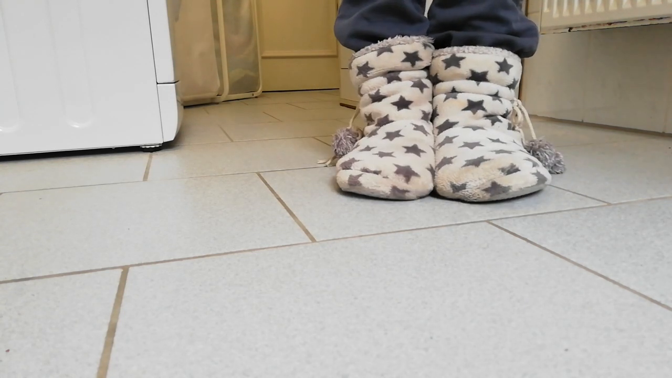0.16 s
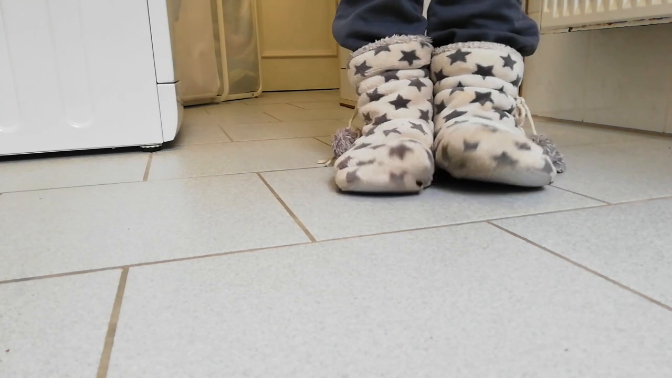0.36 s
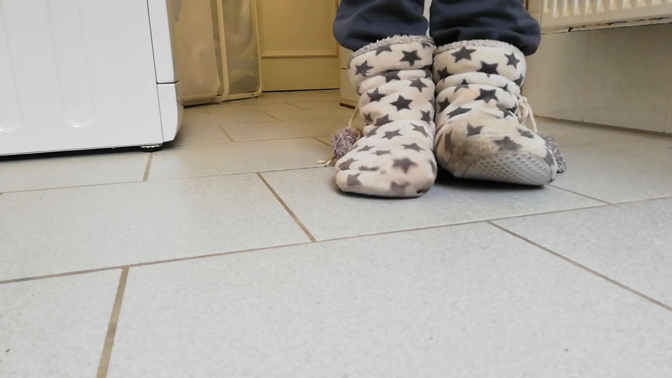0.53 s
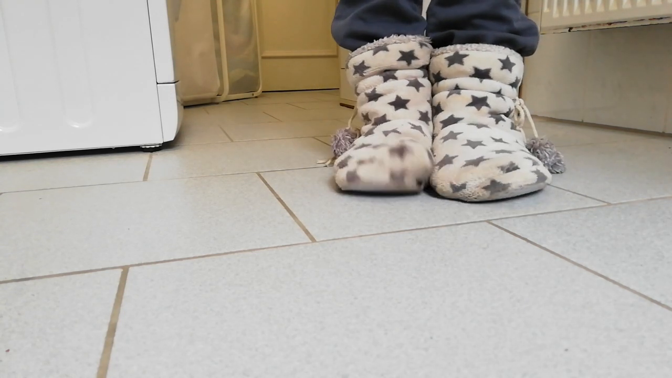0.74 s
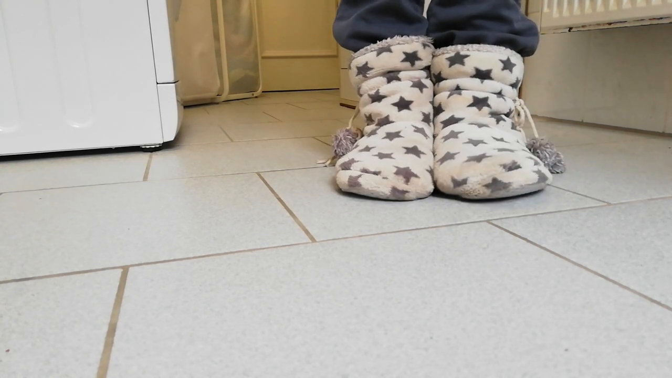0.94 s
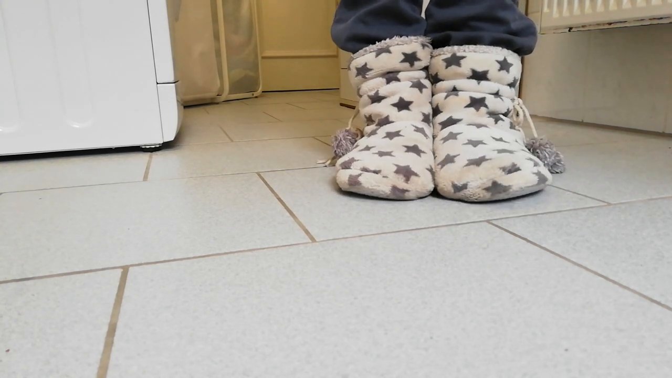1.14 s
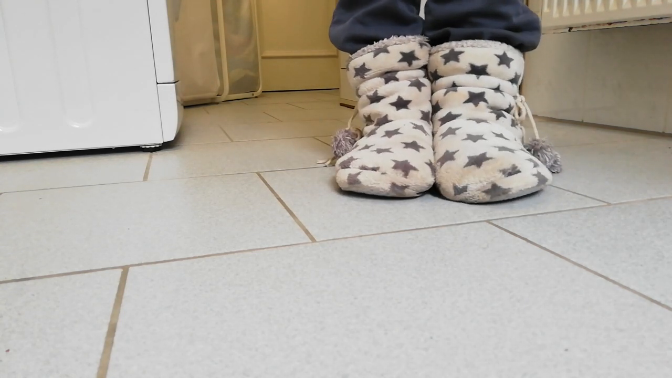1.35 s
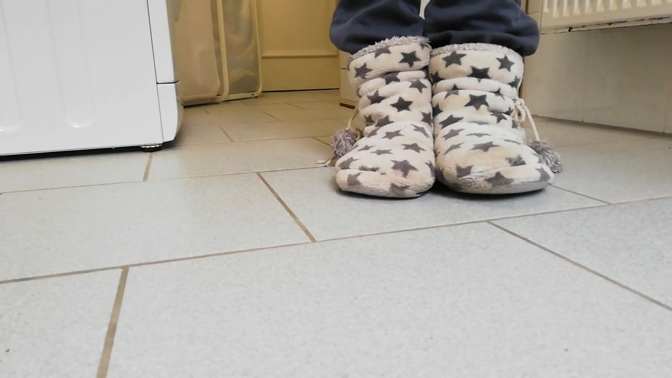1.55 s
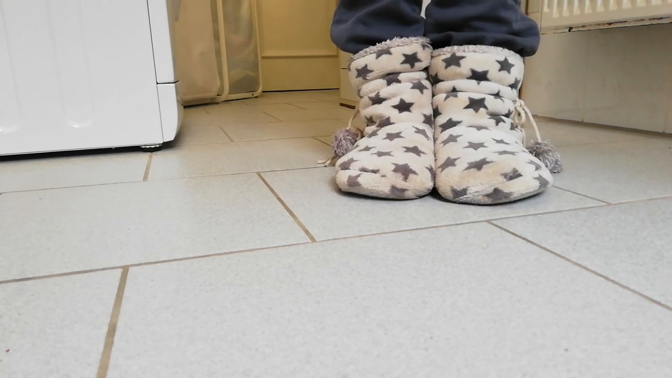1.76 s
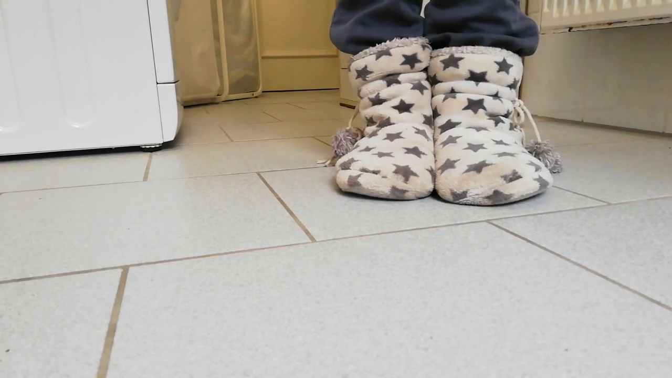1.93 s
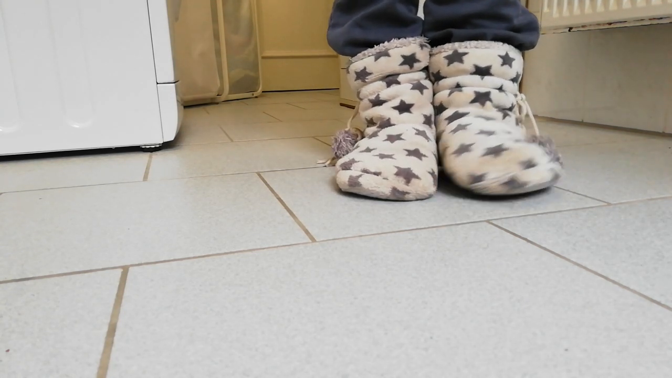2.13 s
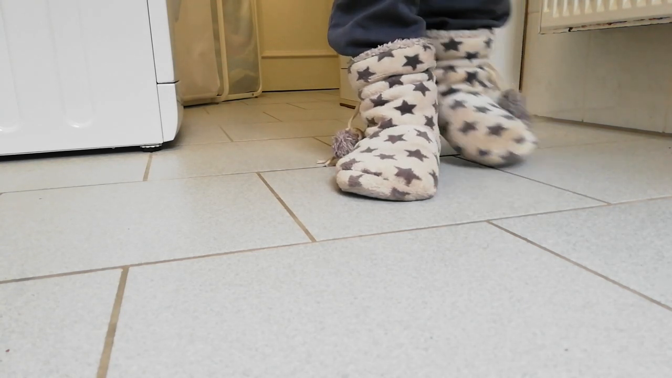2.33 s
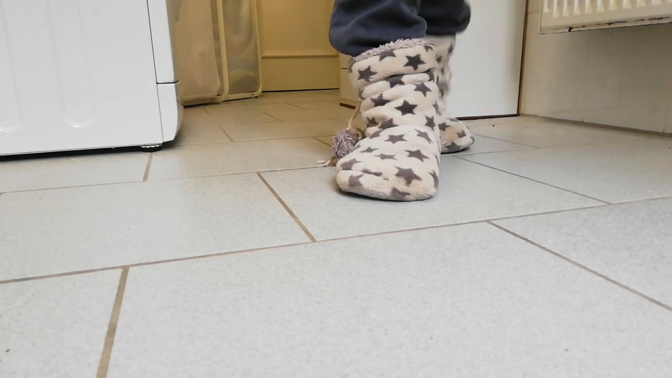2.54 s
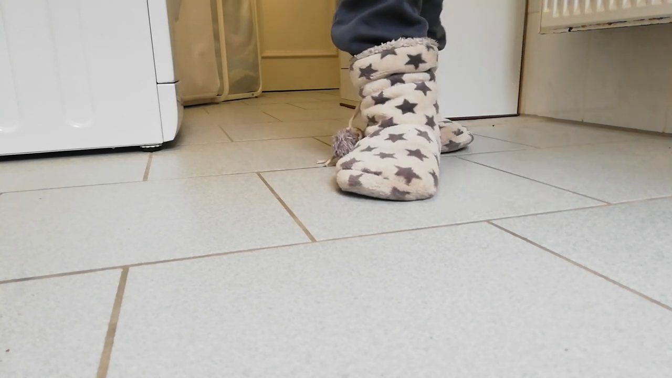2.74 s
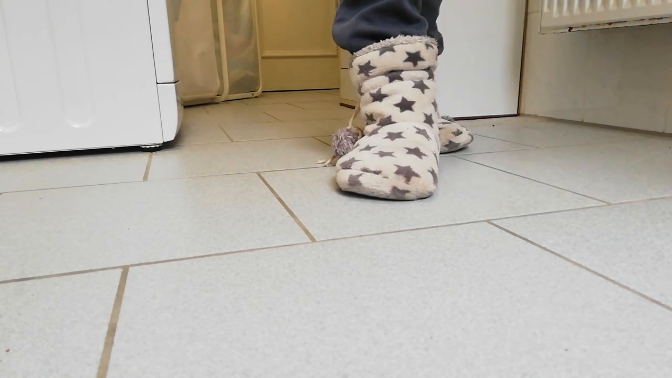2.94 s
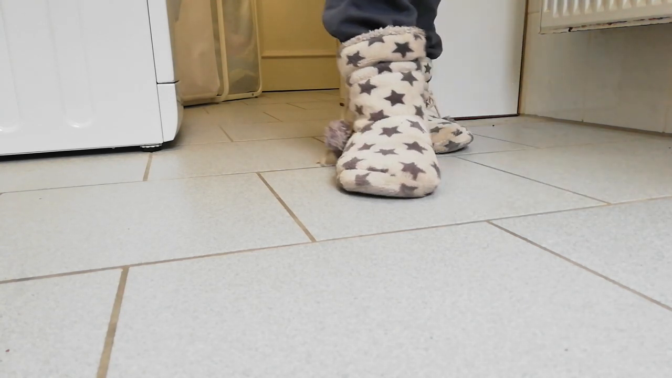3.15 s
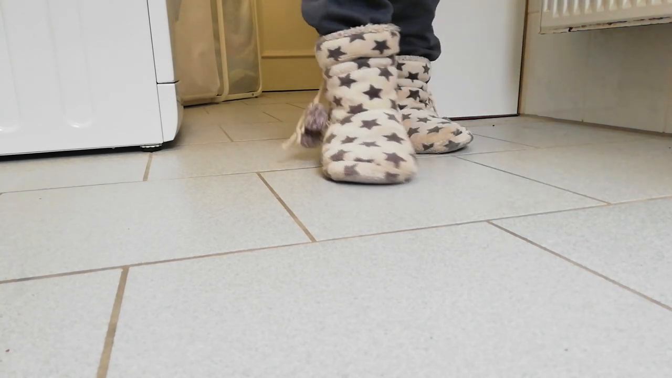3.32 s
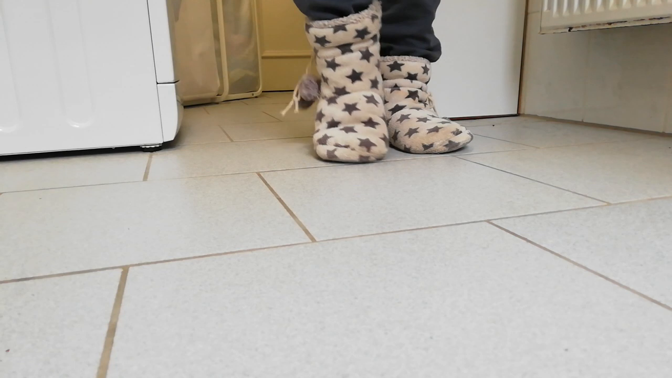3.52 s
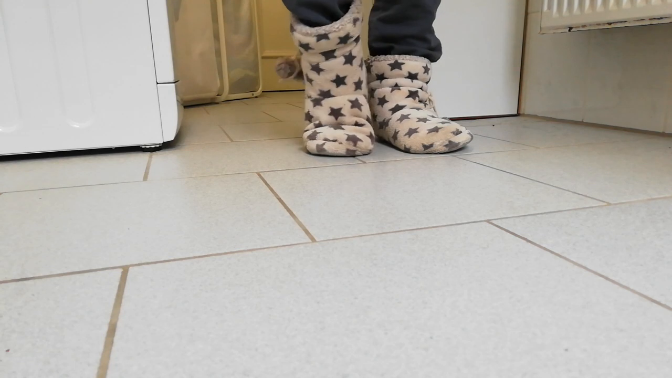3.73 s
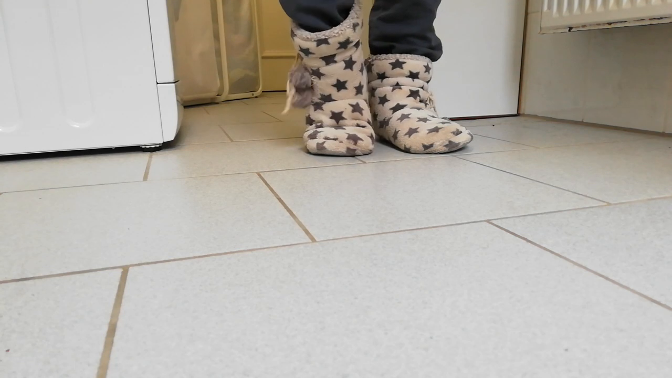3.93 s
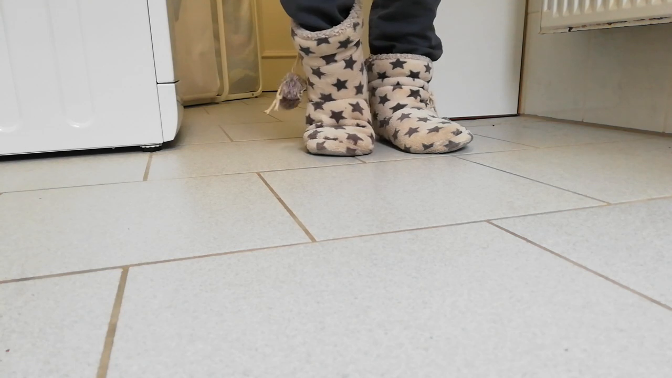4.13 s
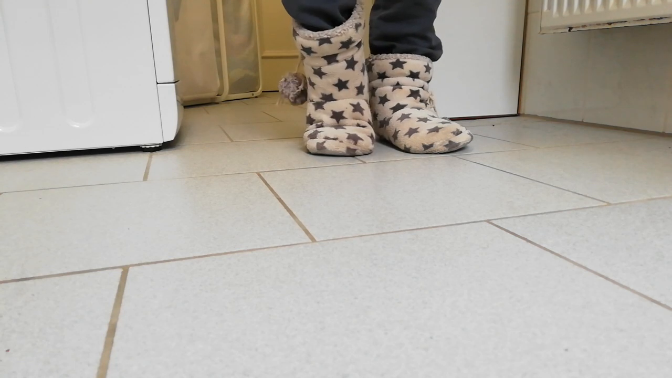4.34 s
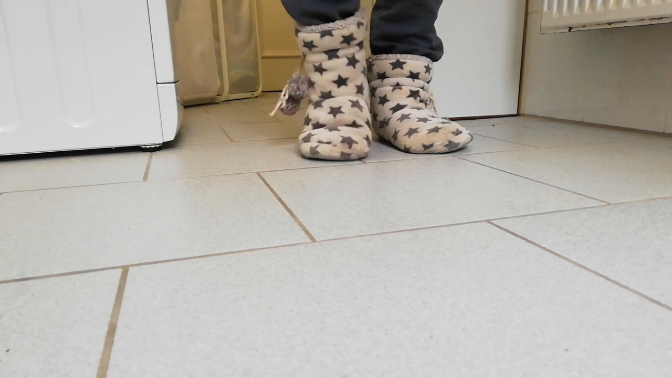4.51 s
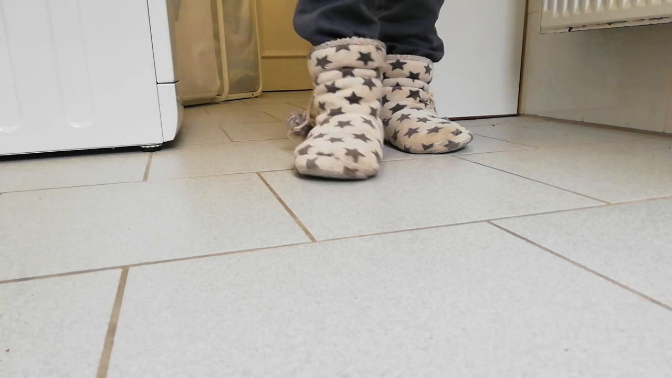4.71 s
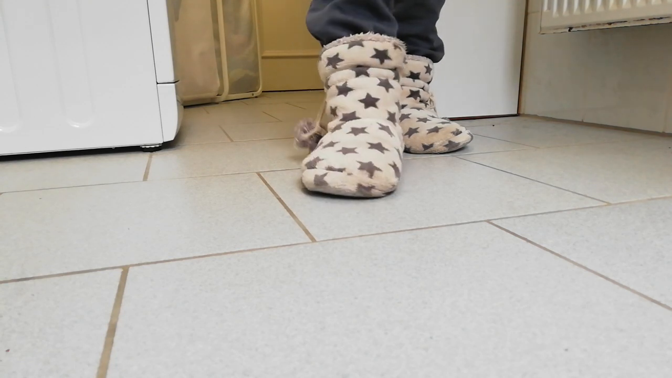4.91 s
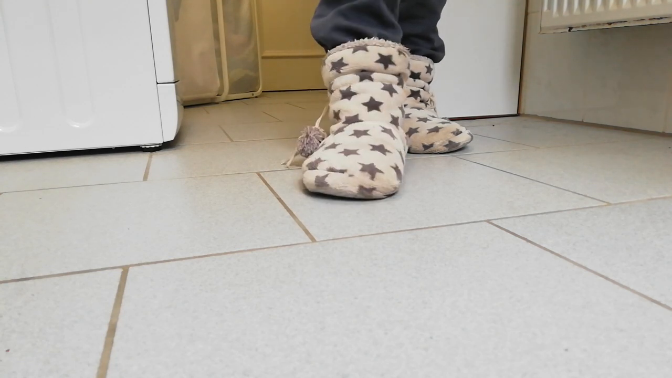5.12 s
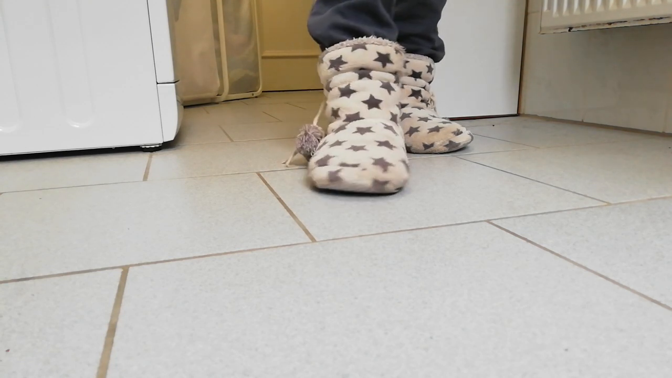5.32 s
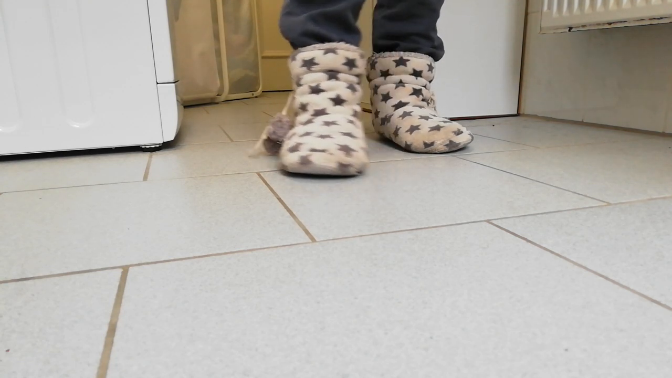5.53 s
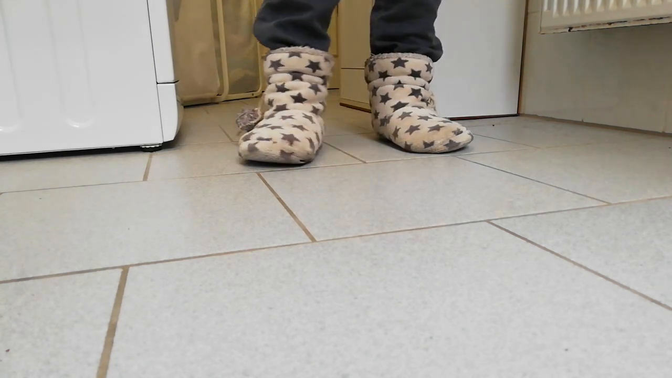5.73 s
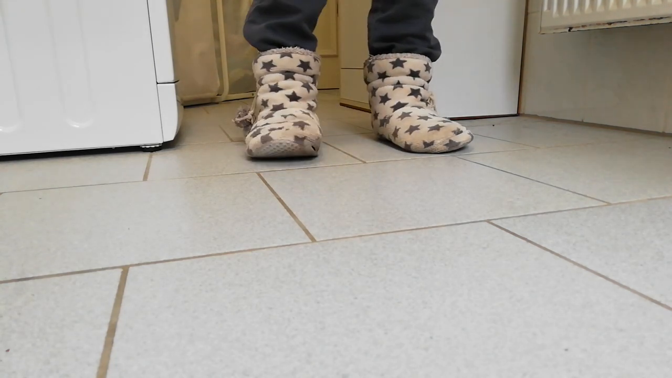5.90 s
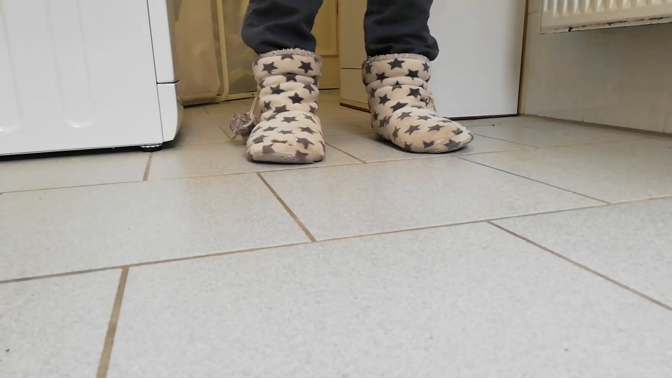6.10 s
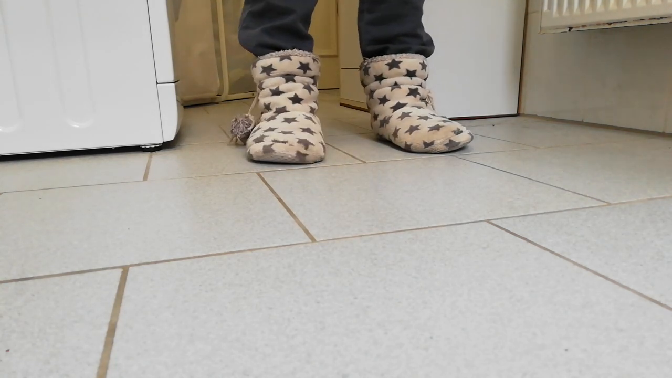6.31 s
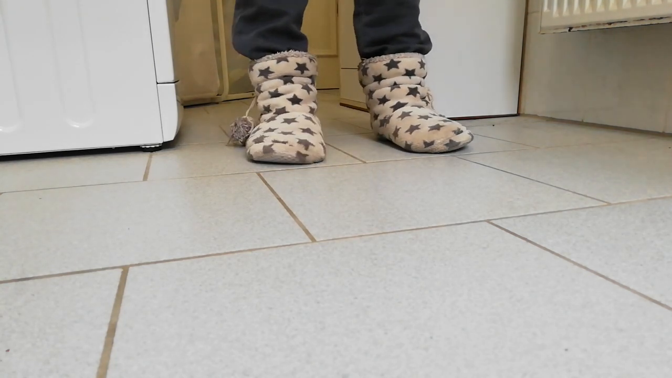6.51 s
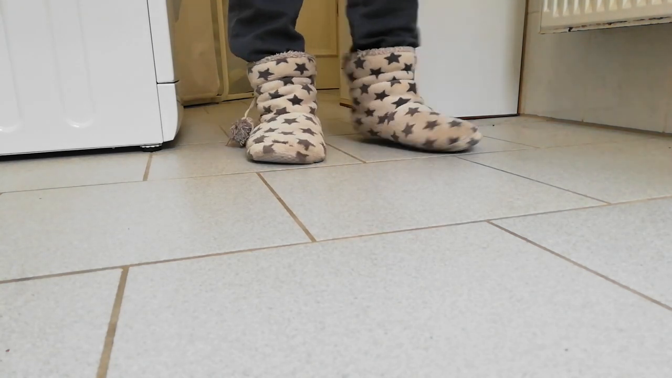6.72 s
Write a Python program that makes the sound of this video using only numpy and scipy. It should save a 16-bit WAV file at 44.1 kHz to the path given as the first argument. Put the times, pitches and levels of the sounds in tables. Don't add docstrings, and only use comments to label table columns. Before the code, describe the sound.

Soft rubber-dotted soles scuff, tap and drag in long gritty slides over smooth ceramic tiles in a small hard room with a faint appliance hum.

```python
import sys
import numpy as np
from scipy import signal
from scipy.fft import rfft, irfft
from scipy.io import wavfile
from scipy.ndimage import uniform_filter1d

SR = 44100
rng = np.random.default_rng(int(sys.argv[2]) if len(sys.argv) > 2 else 0)


def volts_from_decibels(level):
    exponent = np.asarray(level, float) / 20
    return 10 ** exponent


def inscribe(sig):
    pcm = np.round(np.clip(np.atleast_2d(sig).T, -1, 1) * 32767)
    wavfile.write(sys.argv[1], SR, pcm.astype(np.int16))


N = 302526

# centre in Hz, share of the left-right lean, stereo spread 0-1.
LAYERS = [(352, 0.14, 0.34), (1010, -0.072, 0.61), (3190, 0.29, 0.69), (7400, 1, 1), (13100, -0.61, 0.9)]


def rms_one(x):
    return x / np.sqrt(np.mean(x ** 2) + 1e-20)


def at_hz(points, hz):
    table_hz, values = np.array(points)[:, 0], np.array(points)[:, 1]
    return np.interp(np.log(np.maximum(hz, 1)), np.log(table_hz), values)


def drift(rate):
    r = np.exp(-80 * np.pi * rate / SR)
    slow = signal.lfilter([1], [1, -2 * r, r * r], rng.standard_normal(N // 40 + 2002))[2000:]
    return np.interp(np.arange(N) / 40, np.arange(len(slow)), rms_one(slow))


def band(x, low_hz, high_hz):
    return signal.sosfilt(signal.butter(2, [low_hz, high_hz], "band", fs=SR, output="sos"), x)


def resonance(x, hz, width_hz):
    r = np.exp(-np.pi * width_hz / SR)
    gain = (1 - r * r) / 2
    return signal.lfilter(np.array([1, 0, -1]) * gain, [1, -2 * r * np.cos(2 * np.pi * hz / SR), r * r], x)


def coloured(x, spectrum):
    return irfft(rfft(x) * volts_from_decibels(at_hz(spectrum, np.fft.rfftfreq(N, 1 / SR))), N)


def pair(size, likeness):
    alike = np.clip(at_hz(likeness, np.fft.rfftfreq(size, 1 / SR)), -1, 1)
    mid, side = rfft(rng.standard_normal((2, size))) * np.sqrt([(1 + alike) / 2, (1 - alike) / 2])
    return irfft(np.array([mid + side, mid - side]), size)


def lean(db):
    return db * np.array([[.5], [-.5]])


def background():
    # frequency in Hz, level in dB per Hz.
    floor_colour = [(12, -42), (20, -2.5), (49, -15), (106, -3.5), (126, -8.5), (153, -12.5), (267, -13),
                    (440, -17.5), (707, -18.5), (1300, -20.5), (2090, -22.5), (7970, -24), (15600, -33)]
    # frequency in Hz, left-right likeness -1 to 1.
    floor_likeness = [(60, 1), (110, 0.89), (200, 0.66), (380, -0.44), (700, -0.71), (1290, 0.43),
                      (2380, 0.031), (4400, -0.27), (8120, 0.077), (15000, 0.0044)]
    # frequency in Hz, level in dB rms, waver in dB, wavers per second.
    hum_tones = [(100.4, -66.5, 0.5, 4.5), (55.5, -76, 0.5, 9.7), (68.6, -93, 10.5, 6.0)]
    noise = coloured(pair(N, floor_likeness), floor_colour)
    noise = noise / np.std(band(noise, 150, 15700).mean(axis=0))
    t = np.arange(N) / SR
    hum = np.zeros(N)
    for hz, db, waver_db, rate in hum_tones:
        level = volts_from_decibels(db + waver_db * drift(rate)) * np.sqrt(2)
        hum += level * np.sin(2 * np.pi * hz * t + 0.41 * drift(rate))
    floor_db = -67
    swell = volts_from_decibels(.4 * drift(1.5))
    return volts_from_decibels(floor_db) * swell * noise + hum


def tail():
    # frequency in Hz, t60 in seconds.
    wall_t60 = [(100, .42), (500, .33), (1100, .29), (2500, .28), (6000, .23), (14000, .15)]
    # frequency in Hz, left-right likeness.
    wall_likeness = [(60, 0.47), (110, 0.79), (200, 1), (380, -0.11), (700, -1.24), (1290, 0.59),
                     (2380, -0.51), (4400, -0.13), (8120, -1.14), (15000, 1)]
    first_echo_s = 0.00387
    t = np.arange(SR * 2 // 5) / SR
    echoes = pair(len(t), wall_likeness)
    edges = 60 * 2 ** np.arange(0, 8.6, .7)
    out = np.zeros((2, len(t)))
    for low, high in zip(edges, edges[1:]):
        t60 = at_hz(wall_t60, np.sqrt(low * high))
        out += band(echoes, low, high) * volts_from_decibels(-60 * t / t60)
    out = out * (t > first_echo_s)
    return out / np.sqrt(np.sum(out ** 2) / 2)


def room(x, turns_per_s=1.4, walls_db=-1.5):
    phase = 2 * np.pi * turns_per_s * np.arange(N) / SR
    walls = np.zeros((2, N))
    for k in range(3):
        share = np.cos(phase + k * np.pi / 3) * np.sqrt(2 / 3)
        walls += signal.oaconvolve(x * share, tail(), axes=1)[:, :N]
    return (x + volts_from_decibels(walls_db) * walls) / np.sqrt(1 + volts_from_decibels(2 * walls_db))


def thuds():
    # start in seconds, peak in dB, pitch in Hz, t60 in seconds.
    weights = [
        (2.628, -43.5, 52, 0.36),
        (6.5, -55, 45, 0.18),
        (2.5, -61, 60, 0.23),
    ]
    t = np.arange(N) / SR
    out = np.zeros(N)
    for s, peak_db, hz, t60 in weights:
        age = np.maximum(t - s, 0)
        swell = 1 - np.exp(-age * hz / 0.67)
        out += volts_from_decibels(peak_db - 60 * age / t60) * swell * np.sin(2 * np.pi * hz * age)
    return out


def ticks(table):
    out, t = np.zeros((2, N + 4096)), np.arange(4096) / SR
    for s, peak_db, hz, width, t60, lean_db in table:
        burst = (1 + rng.standard_normal(len(t))) * volts_from_decibels(-60 * t / max(t60, .001))
        burst = resonance(resonance(burst, hz, width), hz, width)
        at = round(s * SR)
        out[:, at:at + len(t)] += volts_from_decibels(peak_db - 1.0 + lean(lean_db)) * burst / np.abs(burst).max()
    return out[:, :N]


def brushes():
    # start in seconds, peak in dB, centre in Hz.
    strokes_of_air = [
        (1.295, -47, 4000),
        (1.372, -41, 4000),
        (1.471, -43, 10000),
        (1.496, -44, 6000),
        (.72, -51, 6000),
        (.84, -60, 5000),
    ]
    width_hz, t60_s, lean_db = 6500, .075, -3
    return ticks([(s, db, hz, width_hz, t60_s, lean_db) for s, db, hz in strokes_of_air])


def taps():
    # start in seconds, peak in dB, centre in Hz, t60 in seconds.
    landings = [(.467, -56, 1120, .02), (0.6491, -47, 1840, .008), (.6715, -44, 1150, .015),
                (1.435, -40.5, 1320, 0.03), (1.615, -38.5, 760, 0.035), (1.63, -50, 726, 0.049),
                (2.191, -37, 2600, 0.066), (2.568, -32, 1460, 0.056), (2.569, -43.5, 318, 0.11),
                (2.63, -48.5, 254, 0.1), (6.684, -40.5, 1100, .023), (6.702, -48, 1190, .025)]
    width_share, lean_db = 0.99, 3
    return ticks([(s, db, hz, width_share * hz, t60, lean_db) for s, db, hz, t60 in landings])


def snaps():
    # start in seconds, peak in dB, left-right lean in dB.
    releases = [(0.7264, -52, 1), (0.836, -54, 8), (1.3824, -41, -5), (1.4375, -36, -2), (1.4766, -40, -9),
                (2.1775, -34, -4), (2.1881, -30, 1), (2.5721, -41, -8), (2.62, -34, -4), (2.637, -32, -1),
                (3.2716, -28, 6), (3.3156, -18, 3), (3.8716, -49, 12), (4.4932, -39, 9), (4.5285, -24, 5),
                (5.3444, -40, 1), (5.4254, -16, 5), (5.4957, -18, 6)]
    hz, width_hz, t60_s = 6600, 4600, .003
    return ticks([(s, db, hz, width_hz, t60_s, lean_db) for s, db, lean_db in releases])


def strokes(t):
    # time in seconds, scrape in dB, load on the pad -1 to 1.
    slides = [
        [(3.158, -67, .2), (3.174, -54, 0.16), (3.3, -38.5, -.3), (3.37, -31.5, 0.1), (3.5, -34, -0.16),
         (3.6, -41, 0.12), (3.715, -45, 0.02), (3.73, -62, 0.12), (3.8, -64, 0.83)],
        [(4.484, -88, -.8), (4.492, -47, -1.4), (4.526, -34, -0.66), (4.646, -30, -0.2), (4.792, -29, -0.047),
         (4.94, -35.5, 0.26), (4.986, -35.5, .2), (5.1, -73.5, 0.85)],
        [(5.32, -84, .2), (5.336, -55.5, .2), (5.362, -41, .2), (5.432, -35, 0.43), (5.53, -30, 0.2),
         (5.672, -34.5, 0.43), (5.73, -41.5, 0.75), (5.866, -37.5, 0.33), (5.95, -70.5, 0.9)],
        [(6.668, -78, -.3), (6.683, -49, -0.15), (6.705, -43.5, 0.21), (6.771, -48.5, 0.3), (6.813, -41, -0.33),
         (6.86, -34, 0.73)],
    ]
    # hiss in dB, body in dB, left-right lean in dB.
    slide_colour = [(1, 0.5, 8), (-3.5, -1.5, 10.5), (-2, 1, 10.5), (0, 0, 4)]
    # top in seconds, scrape in dB, rise in seconds, fall in seconds, load.
    scuffs = [(.356, -69, 0.37, 0.54, 0.062), (.672, -62, 0.036, 0.19, 0.87), (.76, -79, .2, .3, 0.21),
              (.87, -67.5, 0.22, .1, .3), (1.298, -57, 0.075, 0.19, 0.14), (1.388, -52, 0.058, 0.22, 0.26),
              (1.492, -63, 0.17, 0.1, -0.46), (1.58, -64.5, .2, 0.069, -1.6),
              (1.615, -58.5, .04, 0.026, -0.51), (1.8, -75.5, .3, 0.34, -1.3),
              (2.181, -40.5, 0.016, 0.056, -0.037), (2.213, -45.5, 0.04, 0.052, 0.99),
              (2.303, -63.5, 0.08, 0.053, 0.92), (2.571, -49.5, 0.0023, 0.21, 0.89),
              (2.634, -40.5, 0.03, 0.016, -0.65), (2.67, -59, 0.11, 0.17, 0.54), (2.85, -82, .2, 0.22, 0.1),
              (3.05, -73, 0.27, 0.46, -.8), (3.84, -70, 0.22, 0.19, 0.26), (6.02, -68, 0.17, 0.18, 0.99),
              (6.12, -77, .1, .1, .3), (6.27, -75, .1, 0.3, -0.75)]
    swell_db = 20
    hiss_db, body_db, lean_db = 0.5, -0.5, 4
    for rows, colour in zip(slides, slide_colour):
        s, db, load = np.transpose(rows)
        yield np.interp(t, s, db, left=-200, right=-200), np.interp(t, s, load), *colour
    for s, db, rise, fall, load in scuffs:
        away = np.maximum((s - t) / max(rise, .002), (t - s) / max(fall, .002))
        yield db - swell_db * np.minimum(away, 10), load, hiss_db, body_db, lean_db


def steering():
    step = 16
    t = np.arange(0, N + step, step) / SR
    powers, *controls = zip(*[(volts_from_decibels(2 * db), *rest) for db, *rest in strokes(t)])
    total = sum(powers)
    load, hiss_db, body_db, lean_db = [sum(p * c for p, c in zip(powers, control)) / total
                                       for control in controls]
    scrape_db = 10 * np.log10(total)
    pad_db = -20.5 + 16 * load
    body_db = -6 + body_db + 0.5 * load
    hiss_db = hiss_db - 3 * load
    return [np.interp(np.arange(N) / SR, t, db) for db in (scrape_db, pad_db, body_db, hiss_db, lean_db)]


def layered(x):
    hz, centres, spectrum = np.fft.rfftfreq(N, 1 / SR), np.array(LAYERS)[:, 0], rfft(x)
    return [irfft(spectrum * at_hz(np.transpose([centres, one]), hz), N) for one in np.eye(len(centres))]


def rubbing(slips_per_s=9000., spread_db=2.5, smooth=0.72, flutter_db=1.16):
    # frequency in Hz, level in dB per Hz.
    scrape_colour = [(88, -74), (150, -30), (359, -14), (396, -13.5), (767, -6), (861, -3.5), (949, -7.5),
                     (1090, 4), (1270, -4.5), (1990, -5.5), (2760, -7.5), (3290, -5), (7730, -2.5),
                     (13800, -10), (15600, -14)]
    # frequency in Hz, width in Hz, level in dB.
    sole_modes = [(880, 38, -2.5), (1150, 190, -12), (1780, 600, -5.5), (2855, 160, 1), (4860, 1000, -3.5),
                  (7810, 2000, 11)]
    slips = volts_from_decibels(spread_db * np.minimum(rng.exponential(1, (2, N)), 5)) * rng.choice([-1, 1], (2, N))
    slips = rms_one(slips * (rng.random((2, N)) < slips_per_s / SR))
    slips = slips + smooth * rng.standard_normal((2, N))
    slips = slips * volts_from_decibels(flutter_db * drift(33))
    ringing = sum(volts_from_decibels(db) * resonance(slips, hz, width) for hz, width, db in sole_modes)
    pad, body, scrape, hiss, air = layered(coloured(slips + ringing, scrape_colour))
    layers = [rms_one(pad), rms_one(body), rms_one(scrape), hiss / np.std(hiss), air / np.std(hiss)]
    scrape_db, pad_db, body_db, hiss_db, lean_db = steering()
    levels = [pad_db, body_db, 0, hiss_db, hiss_db]
    out = np.zeros((2, N))
    for (mid, side), rel_db, (hz, share, spread) in zip(layers, levels, LAYERS):
        wide = (mid + spread * side * [[1], [-1]]) / np.hypot(1, spread)
        out += wide * volts_from_decibels(scrape_db + rel_db + 0.99 * drift(8.8) + share * lean(lean_db))
    return out


def ports(x):
    return np.array([x[0], np.roll(x[1], 2)])


def starved(x, loud_db=-46):
    level_db = 10 * np.log10(uniform_filter1d(np.mean(x ** 2, axis=0), size=1024) + 1e-12)
    for hz, ease in [(14900, 1.2), (14100, .2), (13300, -1.0)]:
        top = signal.sosfiltfilt(signal.butter(10, hz, "high", fs=SR, output="sos"), x)
        given_up = (level_db > loud_db) & (drift(14) < ease)
        x = x - top * uniform_filter1d(1. * given_up, size=256)
    return x


def scene():
    clicks = snaps()
    soles = ports(rubbing()) + 0.5 * clicks + taps() + brushes()
    return room(soles) + 0.7 * clicks + thuds() + background()


def low_pass(x):
    return signal.sosfilt(signal.butter(12, 15700, fs=SR, output="sos"), x)


def record(dry):
    cutoff_hz = 15720
    cut = signal.sosfilt(signal.cheby2(16, 70, cutoff_hz * 1.026, fs=SR, output="sos"), dry)
    mix = starved(cut)
    return low_pass(mix)


dry = scene()
out = record(dry)
inscribe(out)
```